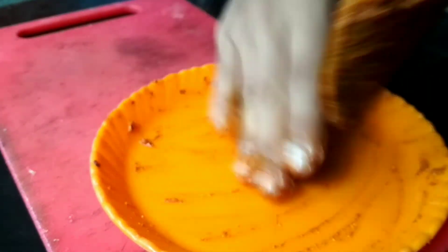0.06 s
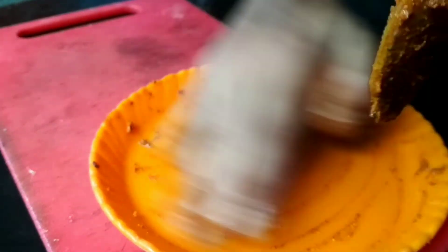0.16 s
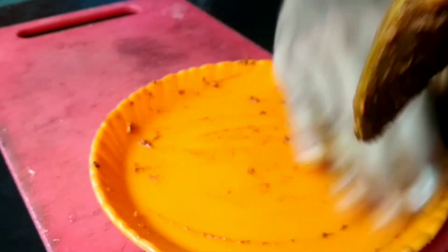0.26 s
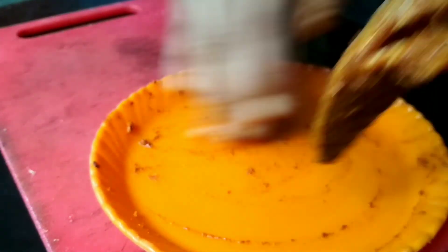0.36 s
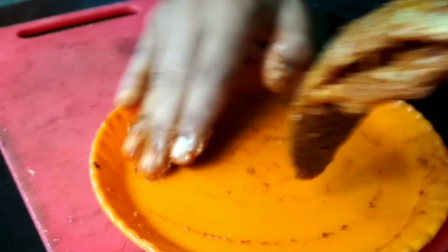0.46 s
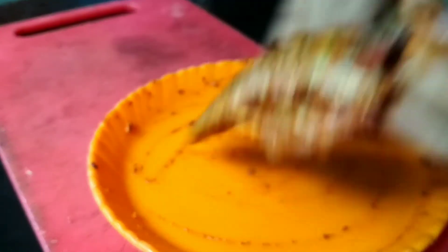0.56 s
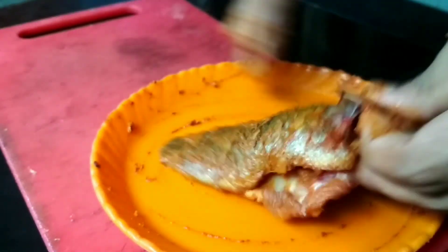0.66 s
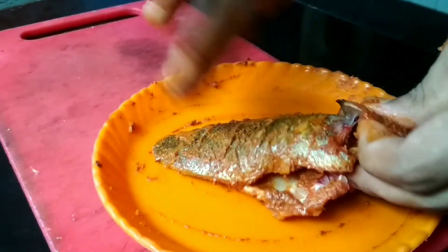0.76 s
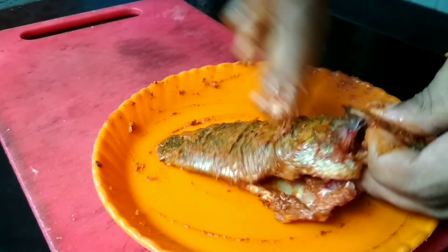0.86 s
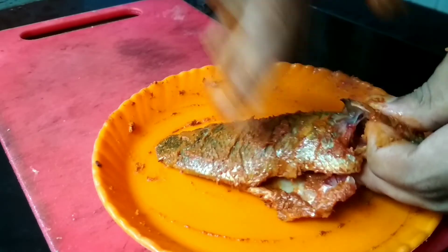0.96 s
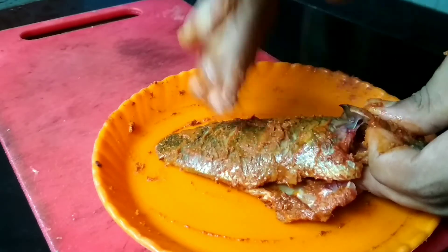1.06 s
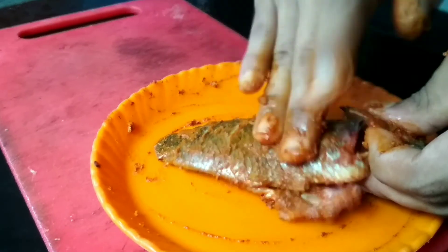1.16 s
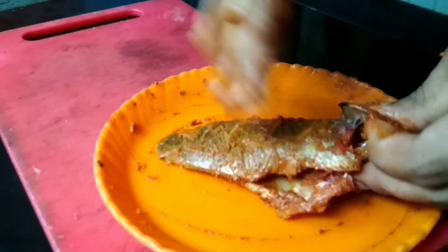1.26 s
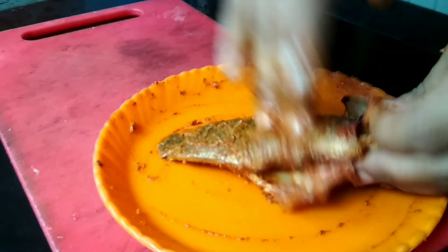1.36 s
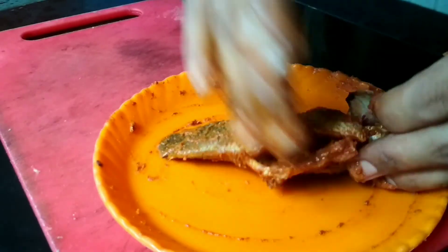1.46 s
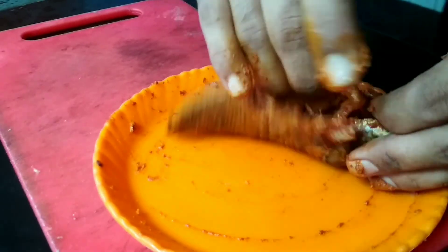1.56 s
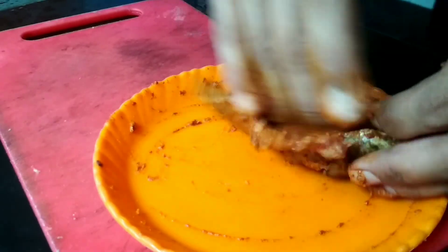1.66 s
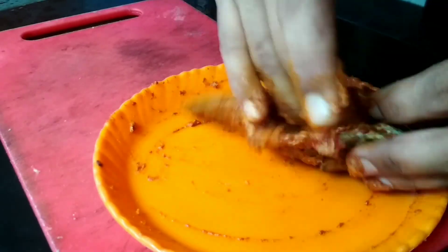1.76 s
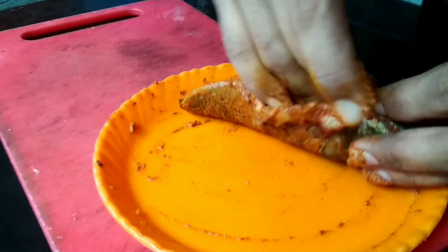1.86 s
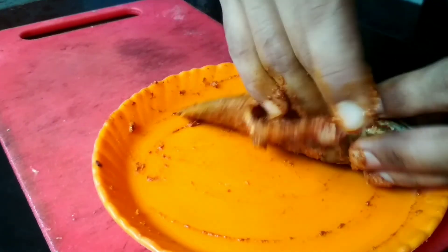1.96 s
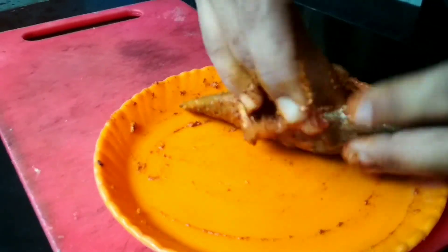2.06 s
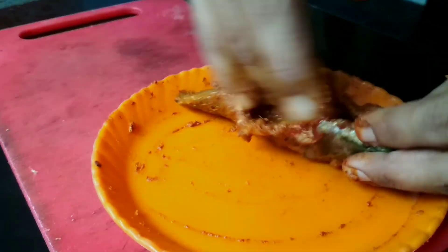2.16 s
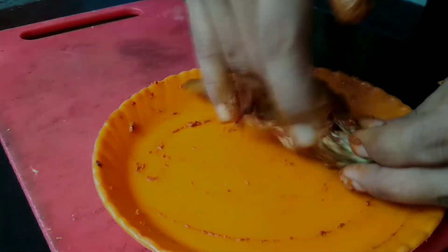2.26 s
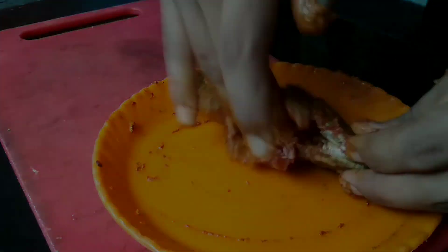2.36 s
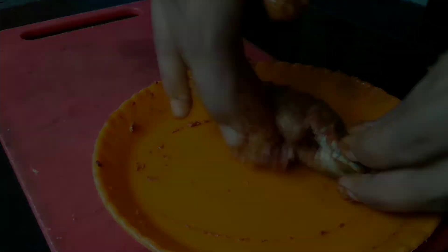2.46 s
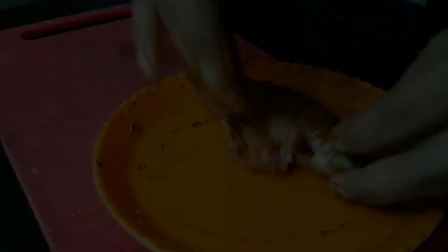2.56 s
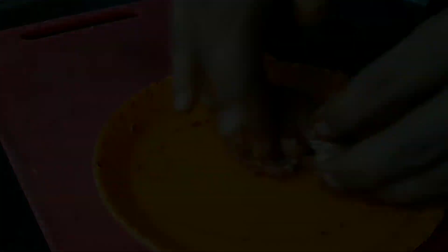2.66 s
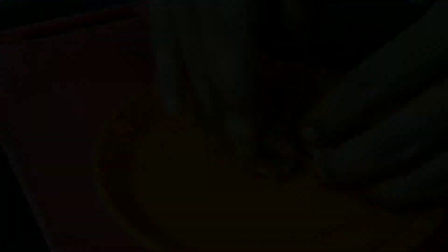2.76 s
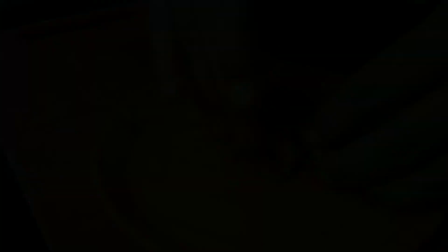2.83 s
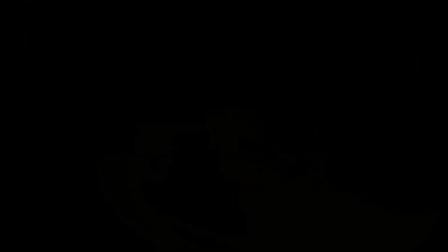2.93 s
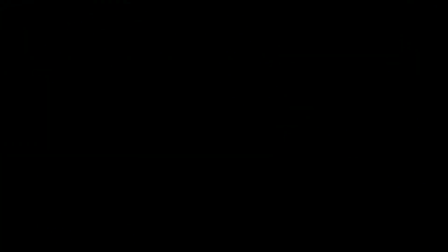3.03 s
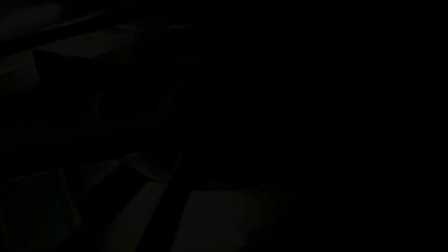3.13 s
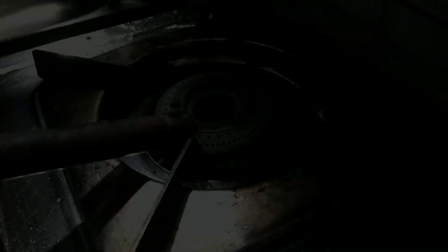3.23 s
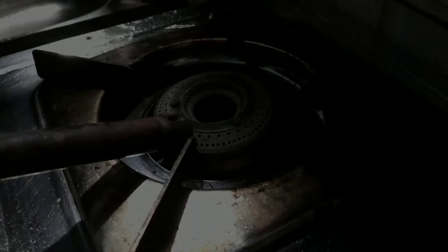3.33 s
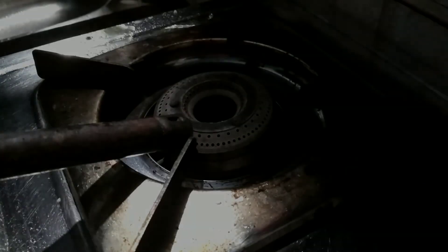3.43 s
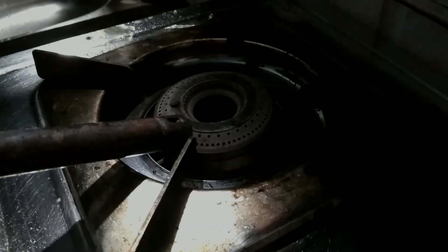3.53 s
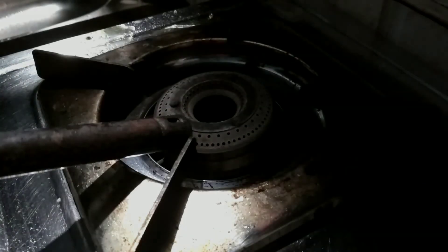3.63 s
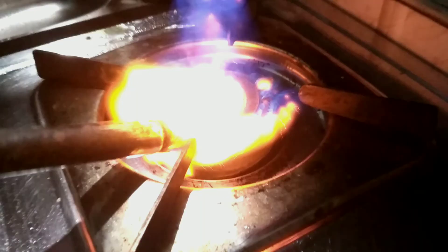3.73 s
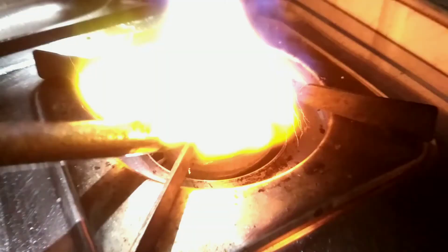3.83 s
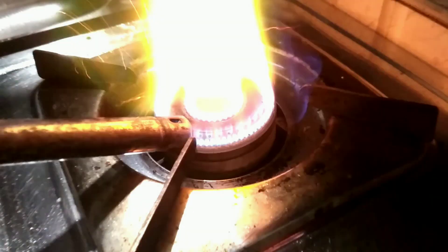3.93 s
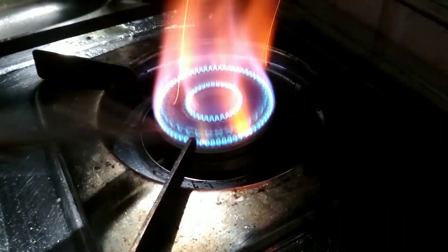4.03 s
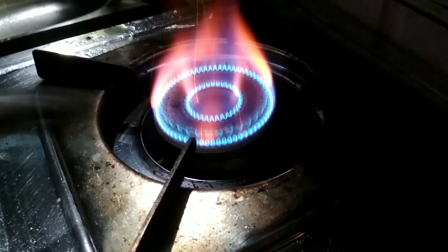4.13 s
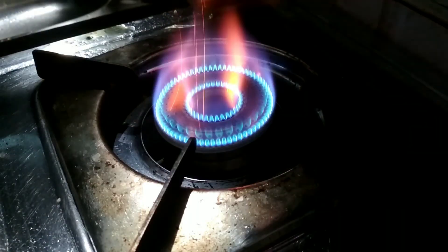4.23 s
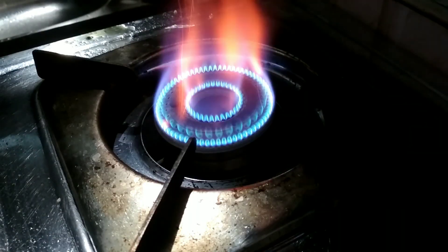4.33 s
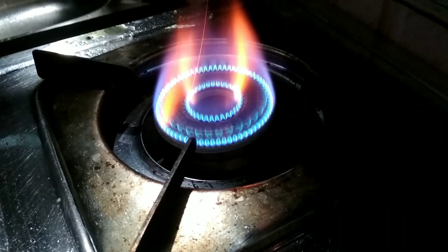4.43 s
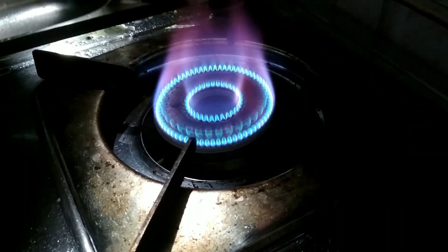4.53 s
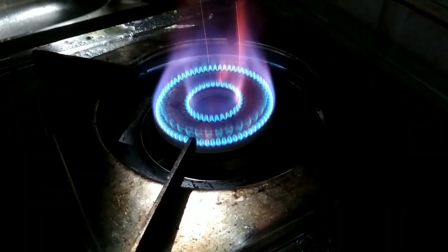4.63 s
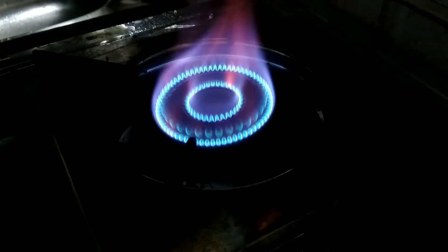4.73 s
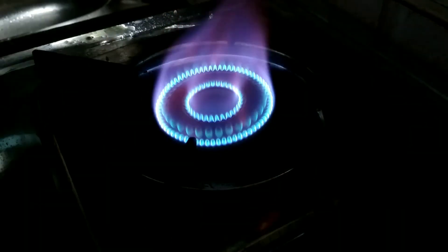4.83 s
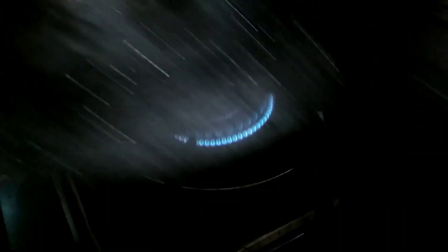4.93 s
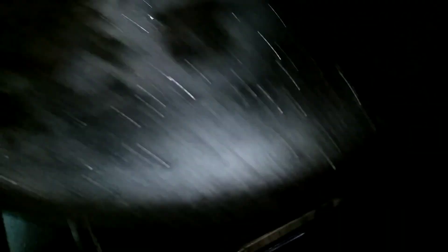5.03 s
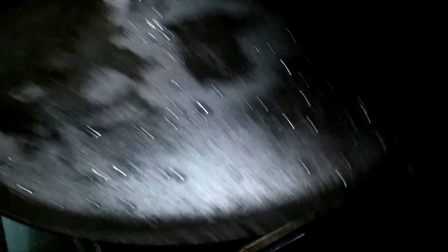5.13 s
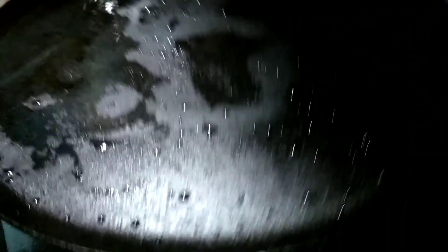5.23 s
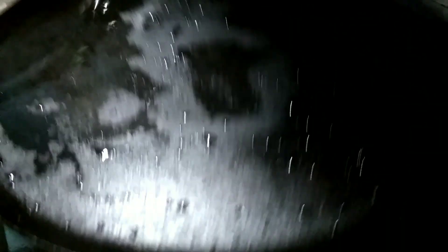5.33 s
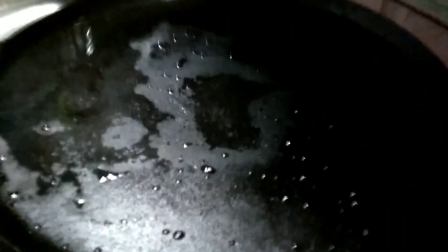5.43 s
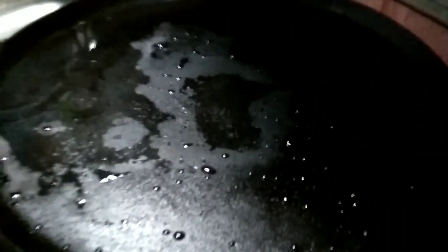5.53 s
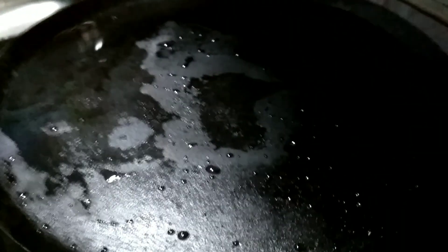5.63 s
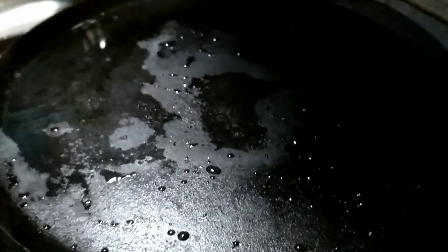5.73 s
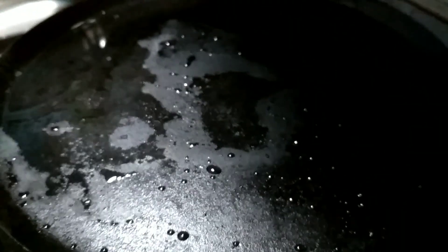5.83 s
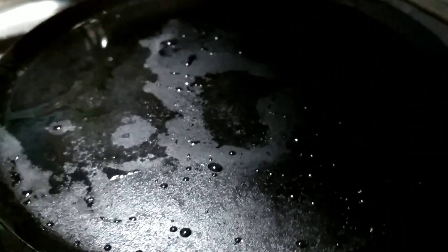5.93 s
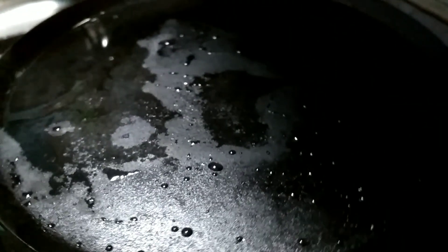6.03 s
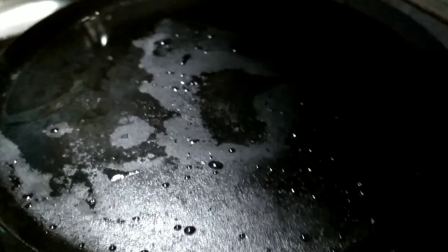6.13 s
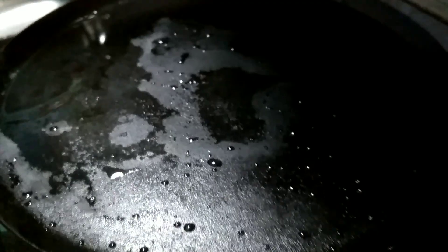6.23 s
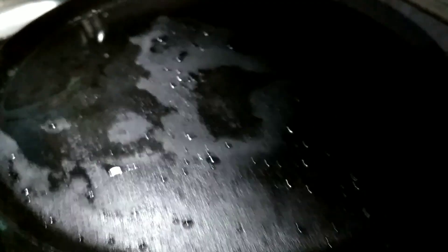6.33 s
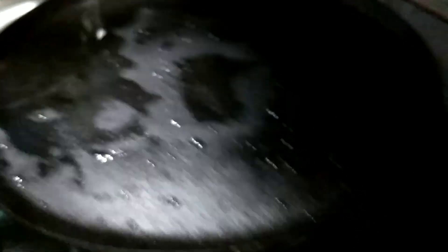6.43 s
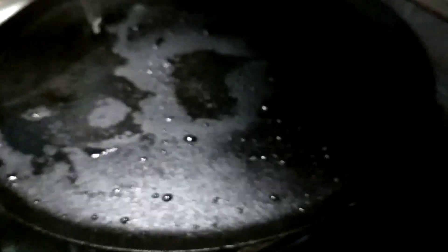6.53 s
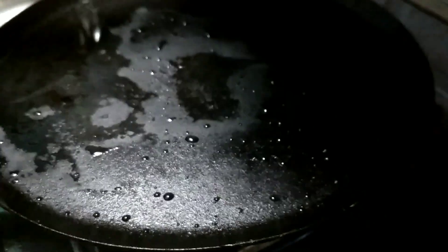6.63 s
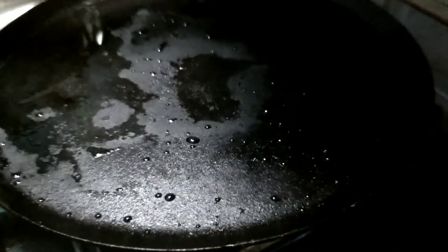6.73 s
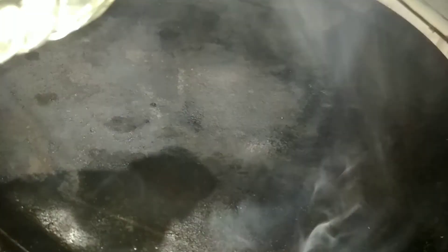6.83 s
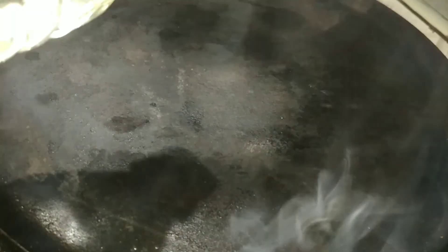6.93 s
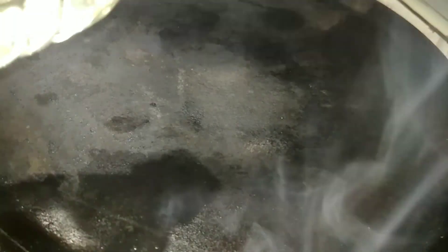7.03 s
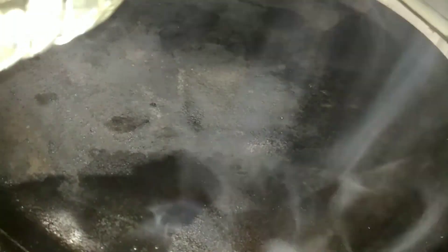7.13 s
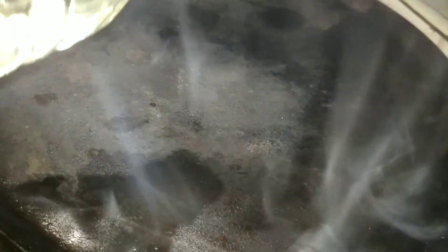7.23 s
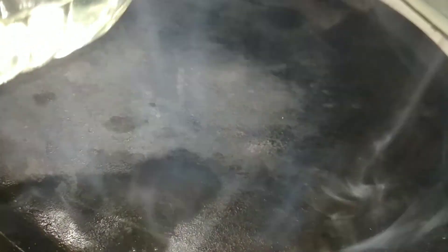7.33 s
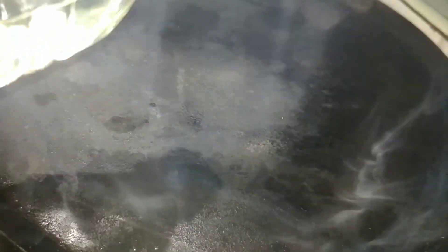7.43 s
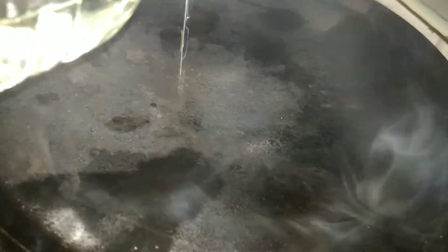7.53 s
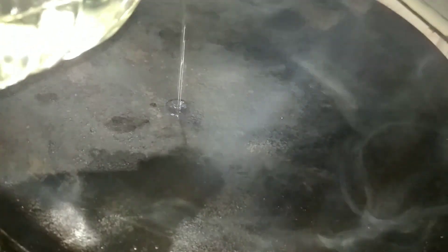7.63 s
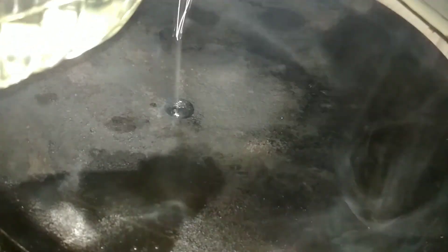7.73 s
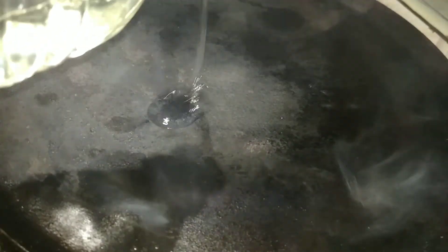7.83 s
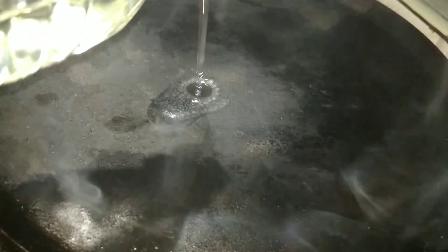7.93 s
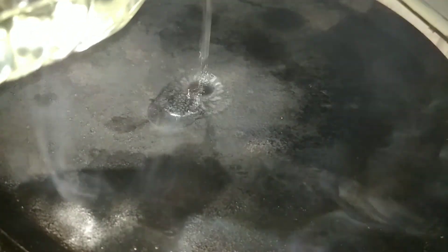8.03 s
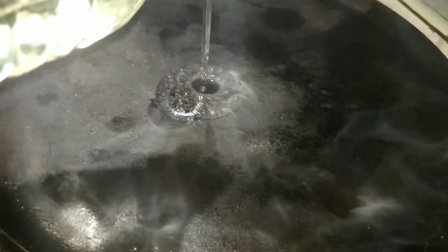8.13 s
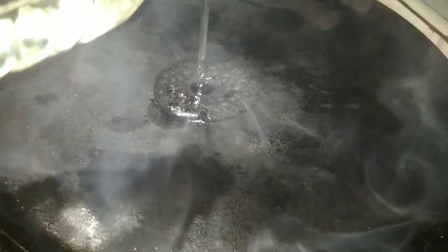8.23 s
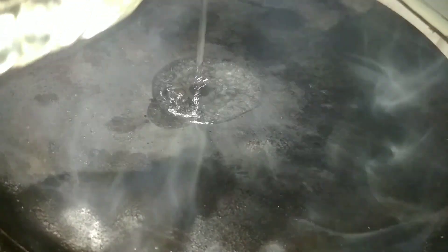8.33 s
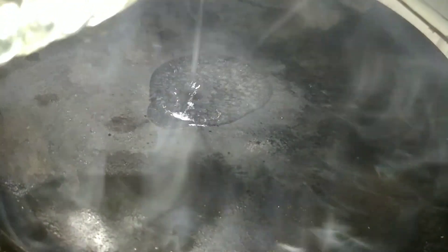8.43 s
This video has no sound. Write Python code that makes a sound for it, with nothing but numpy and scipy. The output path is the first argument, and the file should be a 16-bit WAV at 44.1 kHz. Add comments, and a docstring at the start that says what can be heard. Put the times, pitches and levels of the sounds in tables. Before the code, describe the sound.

For the first two and a half seconds, wet hands rub spice paste into a fish close by: quiet sticky crackles, snaps and squelches, with soft thuds from a plastic plate. Birds and a thin, high insect call very faintly outside. At about 3.4 seconds a gas knob squeaks softly, and at 3.8 the burner catches with a loud crack and whoomp, settling into a faint low flutter and hiss, with a soft rasping insect behind it. At 5.5 seconds a metal pan lands on the grate with a loud, ringing clank. It is knocked and dragged into place until about 7 seconds, scraping hardest around 6.5 and squeaking briefly. From 7 seconds a cricket trills steadily. Just after 8 seconds oil hits the hot pan with a short spit and a faint sizzle.

```python
"""Wet hands rub spice paste into a fish: the paste crackles and snaps, the plastic plate thuds, and
birds and a high insect call outside. This fades out as a stove and a rasping insect fade in.
A gas knob squeaks; the gas catches with a crack and a whoomp, then burns with a low flutter.
A metal pan clanks onto the grate and rings as it is dragged into place and knocked.
A cricket starts to trill, and at last oil hits the hot pan with a spit and a sizzle."""
import sys
import numpy as np
from scipy import signal
from scipy.fft import rfft, irfft, next_fast_len
from scipy.io import wavfile
from scipy.ndimage import map_coordinates

SR = 44100
rng = np.random.default_rng(int(sys.argv[2]) if len(sys.argv) > 2 else 0)


def unload_wav(signal):
    """Save mono or channel-first audio to the path in sys.argv[1] as 16-bit WAV at rate SR, clipped to [-1, 1]."""
    wavfile.write(
        sys.argv[1],
        SR,
        np.round(np.clip(np.atleast_2d(signal).T, -1, 1) * 32767).astype(np.int16),
    )


N = 374409
T = np.arange(N) / SR
LIGHT_S = 3.8185  # the gas catches

# Tone of a sharp snap: pitch_hz, level_db
SNAP_TONE = [(4000, -50), (6800, -12), (11300, 9.5), (15500, 5)]
# Tone of hissing gas: pitch_hz, level_db
HISS_TONE = [(1760, -12), (3000, -6), (5400, -11), (7830, -7.5), (11400, 2), (14900, -5), (16000, -28)]
# Tone of metal clinking on metal: pitch_hz, level_db
CLINK_TONE = [(1470, -25), (2500, -0.5), (3860, -12), (12100, 0), (15200, 3.5), (16000, -34)]
# Notes at which the pan and grate ring: pitch_hz, level_db, ring_s (time to fall by 60 dB)
PAN_NOTES = [(100, -3.5, 0.29), (158, -3, 0.5), (242.1, 1.5, 0.38), (361.7, 4, 0.21), (403.8, -2, 0.34),
             (630.3, 3.5, 0.08), (691, -3.5, 0.12), (759, -3.5, 0.17), (828, -5.5, 0.23), (857, -0.5, 0.2),
             (1027, -8, 0.5), (1430, -12.5, .4)]


def amp(db):
    """Turns decibels into a gain to multiply by."""
    return np.exp(np.asarray(db) * (np.log(10) / 20))


def unit(x):
    """Scales a signal to an average (rms) level of 1."""
    return x / np.sqrt(np.mean(x ** 2) + 1e-20)


def read(points, hz):
    """Looks up values between a table's rows, on a musical (log) pitch scale."""
    pitches, values = np.transpose(points)
    return np.interp(np.log(hz + 1), np.log(pitches + 1), values)


def balance(db):
    """Two gains that make the left channel db louder than the right."""
    return amp([[db / 2], [-db / 2]])


def add(mix, start_s, sound):
    """Mixes a sound in at start_s."""
    part = mix[:, round(start_s * SR):][:, :sound.shape[-1]]
    part += sound[..., :part.shape[1]]


def ramp(start_s, length_s):
    """Rises from 0 to 1 and stays there."""
    return np.clip((T - start_s) / length_s, 0, 1)


def swell(full_s, hold_s, rise_db_per_s, fall_db_per_s):
    """A gain that grows until full_s, holds and dies away."""
    before_db = rise_db_per_s * np.maximum(full_s - T, 0)
    after_db = fall_db_per_s * np.maximum(T - full_s - hold_s, 0)
    return amp(-np.minimum(before_db + after_db, 200))


def dying(ring_s):
    """One second of a gain that falls by 60 dB every ring_s."""
    return amp(-60 * T[:SR] / ring_s)


def blip(peak_s):
    """A soft pulse that peaks after peak_s and dies away."""
    age = T[:SR] / peak_s
    return age * np.exp(1 - np.minimum(age, 200))


def fade_out():
    """Gain that fades the room air and the high insect out."""
    return (1 - ramp(2.473, .98)) ** 2.5


def fade_in():
    """Gain that fades the steady sounds at the stove in."""
    return ramp(3.2, .98) ** 1.15


def waver(per_s, size=N):
    """A random wobble of average size 1 that turns per_s times a second."""
    return unit(np.interp(T[:size] * per_s, np.arange(9000), rng.standard_normal(9000)))


def colour(x, tone):
    """Gives two channels a tone (rows of pitch_hz, level_db) and makes their bass alike."""
    # How alike left and right are: pitch_hz, likeness (0 to 1)
    likeness = [(40, 0.84), (290, 0.93), (640, 0.49), (1400, 0)]
    size = next_fast_len(x.shape[1])
    spectrum, hz = rfft(x, size), np.fft.rfftfreq(size, 1 / SR)
    same = np.clip(read(likeness, hz), -1, 1)
    spectrum[1] = same * spectrum[0] + np.sqrt(1 - same ** 2) * spectrum[1]
    lowest, highest = tone[0][0], tone[-1][0]
    edges = 1 / (1 + (hz / highest) ** 8) / (1 + (lowest / (hz + 1)) ** 8)
    return unit(irfft(spectrum * amp(read(tone, hz)) * edges, size)[:, :x.shape[1]])


def noise(tone, size=N):
    """Stereo noise with the given tone."""
    return colour(rng.standard_normal((2, size)), tone)


def grains(tone, per_s, spread_db):
    """A stream of tiny clicks of uneven size."""
    sizes = amp(spread_db * np.minimum(rng.exponential(1, N), 4))
    clicks = sizes * (rng.random(N) < per_s / SR)
    return colour(clicks * rng.standard_normal((2, N)), tone)


def band(pitch_hz, width_hz):
    """Noise gathered around one pitch."""
    size = next_fast_len(N)
    distance = (np.fft.rfftfreq(size, 1 / SR) - pitch_hz) / width_hz
    spectrum = rfft(rng.standard_normal((2, size))) / (1 + distance ** 2) ** 1.5
    return unit(irfft(spectrum, size)[:, :N])


def patchy(x, depth_db, width_hz, length_s):
    """Lets each range of pitches swell and sink on its own."""
    hz, t, spectrum = signal.stft(x, SR, nperseg=512)
    grid = np.meshgrid(hz / width_hz, t / length_s, indexing="ij")
    patches = map_coordinates(rng.standard_normal(spectrum.shape[1:]), grid, order=1, mode="wrap")
    return unit(signal.istft(spectrum * amp(depth_db * unit(patches)), SR)[1][:, :N])


def tail(x, ring_times):
    """Lets each pitch in one second of noise die at its own speed."""
    hz, t, spectrum = signal.stft(x, SR, nperseg=512)
    decay = amp(-60 * t / read(ring_times, hz)[:, None])
    return signal.istft(spectrum * decay, SR, nperseg=512)[1][:, :SR]


def ring(notes):
    """The dying notes of a struck object; high ones reach left and right out of step."""
    out = np.zeros((2, SR))
    for hz, db, ring_s in notes:
        phase = rng.uniform(0, 2 * np.pi) + min(hz / 900, np.pi) * rng.uniform(-1.8, 1, (2, 1))
        out += amp(db) * dying(ring_s) * np.sin(2 * np.pi * hz * T[:SR] + phase)
    return out * (1 - dying(0.03))


def excite(force, ringing):
    """Lets every little push in a force start the same ringing."""
    return signal.oaconvolve(force, ringing, axes=1)[:, :N] / np.linalg.norm(ringing[0])


def sine(hz):
    """A pure tone that follows a changing pitch."""
    return np.sin(2 * np.pi * np.cumsum(hz) / SR)


def whistles(notes, echo_db, echo_s):
    """Gliding, unsteady notes with their echo."""
    out = np.zeros((2, N))
    for start_s, length_s, first_hz, last_hz, db, wobble_hz in notes:
        size = int(length_s * SR)
        hz = np.linspace(first_hz, last_hz, size) + wobble_hz * waver(395.5, size)
        loudness = signal.windows.tukey(size, .5) * amp(3.8 * waver(94.2, size))
        add(out, start_s, amp(db) * unit(sine(hz) * loudness))
    echo = unit(rng.standard_normal((2, SR)) * dying(echo_s)) / np.sqrt(SR)
    return 0.81 * out + amp(echo_db) * signal.oaconvolve(out, echo, axes=1)[:, :N]


def room_air():
    """A faint, shifting rumble and hiss."""
    # Tone of the room: pitch_hz, level_db
    air_tone = [(15, -19), (25, 3.5), (195, -4.5), (659, -22), (2910, -14.5), (5730, -19.5), (10100, -10),
                (14800, -5), (16000, -19.5)]
    return amp(-66) * patchy(noise(air_tone), 2.5, 350, .07)


def birds():
    """Distant birds whistle short notes, with more echo than direct sound."""
    # Bird notes: start_s, length_s, first_hz, last_hz, level_db, wobble_hz
    calls = [(.615, 0.14, 1125, 1217, -65, 53.3), (1.525, 0.18, 1115, 1229, -68.5, 55),
             (2.395, 0.16, 1128, 1237, -72.5, 52), (2.48, 0.15, 3420, 2466, -71.5, 229),
             (2.57, 0.11, 2476, 2400, -72.5, 81), (2.7, 0.073, 3045, 3110, -64.5, 53),
             (2.81, 0.059, 3470, 3543, -70, 31), (4.49, 0.11, 2987, 3006, -71, 51.7),
             (2.72, 0.25, 2700, 2520, -80, 399)]
    return whistles(calls, echo_db=3.5, echo_s=0.48)


def high_insect():
    """A thin tone on the right that warbles with each wingbeat."""
    wingbeats = np.cumsum(42 * (1 + .2 * waver(30))) / SR
    hz = 10890 + 110 * np.sin(2 * np.pi * wingbeats) + 60 * waver(15) + 50 * waver(900)
    return amp(-69.5) * sine(hz) * balance(-24.5)


def insect_whine():
    """A thin, steady, insect-like whine."""
    hz = 11747 + 9 * ramp(6.85, 0.22) + 2 * waver(8)
    return amp(-62) * sine(hz) * balance(-2.9)


def rasping_insect():
    """An insect chirps about eight times a second, in three falling pulses, over its own echo."""
    repeat_s, pulse_s = .129, .021
    pulses = (T - 6.3 + .002 * waver(8)) % repeat_s / pulse_s
    within = pulses % 1
    hz = 7450 - 900 * within + 220 * waver(1500)
    pulse_shape = (pulses < 3) * np.sin(np.pi * within ** .5) ** 2
    chirp = pulse_shape * np.sin(np.pi * (pulses + .5) / 4) * amp(waver(40))
    echo = (.5 + .5 * np.exp(-((pulses - 2) / 2) ** 2)) * band(7070, 340)
    return amp(-59) * chirp * sine(hz) + amp(-61.5) * echo


def cricket():
    """A cricket's wings make a fast, pure trill; each stroke sags in pitch."""
    strokes = np.cumsum(51 * (1 + .1 * waver(30))) / SR
    hz = 5278 - 60 * (strokes % 1 - .5) + 6 * waver(71)
    trill = abs(np.sin(np.pi * strokes)) * sine(hz) * amp(waver(40))
    song = amp(-47.5) * trill * balance(10.2) + amp(-56.5) * band(5240, 140)
    return song * ramp(start_s=6.98, length_s=0.088)


def burner():
    """A low flutter grows as the gas lights and dulls under the pan; the jet hisses."""
    # Tones of the open flame, the flame under the pan and the gas jet: pitch_hz, level_db
    open_tone = [(15, -42), (25, -10), (81, 0), (386, -15), (883, -26), (1070, -32), (1570, -20.5),
                 (1870, -31), (2100, -52.5), (5500, -110)]
    covered_tone = [(15, -37), (25, -4.5), (86, -1), (193, -4.5), (257, -13.5), (567, -24.5), (687, -45.5),
                    (1270, -49.5), (1430, -28), (1570, -17.5), (2500, -62)]
    jet_tone = [(2500, -29), (3700, -19), (4500, 7), (5400, -37.5), (7800, -15), (8800, -0.5),
                (11000, -5.5), (14200, -0.5), (15300, -23)]
    covered = ramp(6.85, 0.22)
    flame = amp(-55.5) * noise(open_tone) * (1 - covered) + amp(-57) * noise(covered_tone) * covered
    flame *= amp(0.5 * waver(25)) * (amp(-5) * fade_in() + amp(-9) * ramp(LIGHT_S, 0.029))
    jet = amp(-60) * patchy(noise(jet_tone) + amp(-8) * band(12930, 130), 2.2, 600, .07)
    return flame + jet * fade_in()


def gas_knob():
    """The gas knob scrapes as it turns and unlit gas starts to hiss."""
    # Scrapes of the gas knob: start_s, length_s, level_db
    brushes = [(3.348, 0.031, -63), (3.48, 0.6, -59.5)]
    gas_on_s = 3.67
    touch = sum(amp(db) * swell(start_s, length_s, 165, 240) for start_s, length_s, db in brushes)
    brush = touch * noise([(180, -0.5), (245, 12), (400, -7), (800, -8), (1400, -11), (2600, -38)])
    return brush + amp(-72.5) * swell(gas_on_s, LIGHT_S - gas_on_s, 400, 200) * noise(HISS_TONE)


def squeaks():
    """The gas knob squeaks as it turns, and later so does the pan."""
    # Squeaks: start_s, length_s, first_hz, last_hz, level_db, wobble_hz
    notes = [(3.425, 0.098, 306.5, 254, -53, 22), (3.425, 0.11, 602, 546, -62, 36),
             (6.555, 0.047, 4420, 4520, -38.5, 90), (6.98, 0.087, 297, 283, -49.5, 3.9)]
    return whistles(notes, echo_db=-2.5, echo_s=0.19)


def oil():
    """Oil lands on the hot pan with a short spit, then sizzles in uneven patches as it spreads."""
    land_s, fall_db_per_s = 8.084, 12
    oil_tone = [(500, -7), (2800, -5.5), (6000, -9), (11500, 11), (15500, 6)]
    loudness = amp(-65 - fall_db_per_s * np.maximum(T - land_s, 0)) * ramp(land_s, 0.02)
    bubbles = grains([(2200, 0), (4400, 4), (5100, -14)], 4000, 1.0)
    out = loudness * patchy(grains(oil_tone, 1400, 1.5) + bubbles, 5.5, 300, .03)
    spit = amp(-44) * noise(oil_tone, SR) * (blip(.003) + amp(-5.5) * dying(0.49))
    add(out, land_s, spit)
    return out


def plate():
    """The hand judders over the plate in soft thuds, with a faint rumble of rubbing between them."""
    # Pushes of the hand: start_s, length_s, level_db
    pushes = [(0.162, .045, -45), (.262, .015, -48.5), (0.336, .075, -43.5), (0.514, .015, -39),
              (0.636, .045, -44), (0.739, .045, -41.5), (1.192, .075, -48), (1.63, .045, -48.5)]
    # Notes of the plastic plate: pitch_hz, level_db, ring_s
    plate_notes = [(187.5, -1, 0.12), (358, -11.5, 0.036)]
    slip_gap_s = .03
    rumble = noise([(60, 7.5), (100, 3), (185, 5.5), (350, -12), (800, -21)])
    out = amp(-73.5) * rumble * amp(6.4 * waver(22.07)) * swell(0, 2.37, 0, 77)
    for start_s, length_s, push_db in pushes:
        for delay_s in np.arange(0, length_s, slip_gap_s):
            load = rng.uniform(0.87, 1.067)  # the hand's weight shifts the plate's pitch
            thud = ring([(hz * load, db, ring_s) for hz, db, ring_s in plate_notes])
            add(out, start_s + delay_s, amp(push_db) * thud * (1 - dying(0.021)))
    return out


def paste():
    """Paste crackles under the fingers; sticky films snap and peel away, and trapped air pops."""
    # Wipes of the hand through the paste: start_s, length_s, level_db
    wipes = [(0.253, 0.096, -61), (.56, 0.035, -58), (.68, 0.035, -59.5), (1.59, 0.038, -55),
             (2.413, 0.043, -52)]
    # Wet smacks of paste and skin: start_s, rise_s, snap_db, slap_db
    smacks = [(0.8725, .0005, -35, -88), (0.888, .0004, -29, -88), (1.027, .0016, -43, -53),
              (1.0385, .0006, -36, -70), (1.0494, .0004, -29.5, -58), (1.1075, .0003, -38.5, -80),
              (1.1985, .001, -32, -53), (1.2402, .0004, -38.5, -70), (1.3495, .0024, -39.5, -55),
              (1.433, .0004, -41, -77), (1.502, .0007, -38, -78), (1.592, .0008, -37, -70),
              (1.7395, .0016, -45, -75), (2.3085, .0016, -45, -62), (2.405, .003, -45, -65),
              (2.443, .0022, -38, -65)]
    # Air pops under the fish skin: start_s, level_db
    pops = [(1.9528, -45), (2.0805, -47)]
    # Tones of the wet crackle, a pop and a fleshy slap: pitch_hz, level_db
    wet_tone = [(1180, -10), (3000, -17), (4300, -24), (6760, -14), (11300, 9.5), (15500, 0)]
    pop_tone = [(3800, -11), (6200, -7), (9000, -7.5), (14000, -4)]
    slap_tone = [(300, -5), (900, -1.5), (1800, 7.5), (4500, 4), (7000, 13.5)]
    rub = amp(-65 + 2.5 * np.tanh(waver(9.7))) * swell(0, 2.57, 0, 82)
    wipe = sum(amp(db) * swell(start_s, length_s, 300, 300) for start_s, length_s, db in wipes)
    crackle = patchy(grains(wet_tone, 1500, 1.5) + .4 * grains(wet_tone, 90, 2), 2.5, 1200, .035)
    out = np.hypot(rub, wipe) * crackle
    peeling = np.zeros((1, N))  # smaller snaps follow each smack
    for start_s, rise_s, snap_db, slap_db in smacks:
        snap = amp(snap_db) * noise(SNAP_TONE, SR) * (blip(rise_s) + amp(-22.5) * dying(0.33))
        slap = amp(slap_db) * noise(slap_tone, SR) * (blip(0.0015) + amp(-8) * dying(0.28))
        add(out, start_s, snap + slap)
        add(peeling, start_s, amp(snap_db - 30) * dying(0.51))
    for start_s, db in pops:
        add(out, start_s, amp(db) * noise(pop_tone, SR) * (dying(0.013) + amp(-14.5) * dying(0.51)))
    return out + peeling * grains(wet_tone, per_s=570, spread_db=3.2)


def fish():
    """Each squeeze squelches the flesh and smears the paste, over the crackle and the thuds."""
    # Squeezes of the flesh: start_s, length_s, squelch_db, smear_db
    squeezes = [(1.796, 0.035, -96, -61.5), (1.993, 0.088, -75, -90), (2.28, 0.062, -63.5, -66.5),
                (2.52, 0.021, -73.5, -71.5)]
    flesh = grains([(260, -7), (350, 12), (450, -5), (600, -20)], 140, 1.2)
    skin = grains([(1400, 5), (1850, -4), (2500, -6), (5000, -5), (8000, 10)], 1600, 1.2)
    squelch = smear = 0
    for start_s, length_s, squelch_db, smear_db in squeezes:
        grip = swell(start_s, length_s, 250, 220)
        squelch += amp(squelch_db) * grip
        smear += amp(smear_db) * grip
    return (paste() + smear * skin) * balance(-4) + plate() + squelch * flesh


def ignition():
    """The flame cracks through the pooled gas, which burns off in a whoomp; a last pocket flares."""
    # Tones of the whoomp, the last flare, the swirls and the crack: pitch_hz, level_db
    roar_tone = [(32, -40), (55, -17), (95, -5.5), (176, -8.5), (239, -3), (319, -12), (537, -15.5),
                 (642, -11.5), (903, -22), (1290, -18.5), (4000, -42.5)]
    flare_tone = [(300, -1), (850, 0), (1400, -10), (2300, -11.5), (3500, -20), (11000, -16)]
    swirl_tone = [(330, 7), (900, 3), (1400, 6), (2300, -3.5), (3500, -42)]
    crack_tone = [(200, -15), (1500, 9), (6000, -10), (11000, 4), (15000, 5.5)]
    flare_s = 4.032
    burst = amp(-20) * swell(LIGHT_S, 0.044, 0, 231)
    tall_flames = amp(-41.5) * swell(LIGHT_S, 0.19, 0, 81)
    fire = np.hypot(burst, tall_flames)
    roar = fire * noise(roar_tone) * amp(0.83 * waver(70))
    tongues = patchy(grains(HISS_TONE, 9000, 1.1), 2.8, 800, .012)
    hiss = amp(-35) * swell(LIGHT_S, 0.096, 0, 113) * tongues
    # small swirls at the flame's edge add a tearing sound
    swirls = amp(-12.5) * fire * grains(swirl_tone, 1100, 1.4) * amp(2 * waver(60))
    out = (T >= LIGHT_S) * ((roar + swirls) * balance(0.94) + hiss * balance(-1.7))
    crack = amp(-23.5) * noise(crack_tone, SR) * dying(0.065)
    ms = T[:SR] / .001
    pressure = amp(7) * ms * (1 - ms) * np.exp(-2 * ms)  # rises fast, then swings below zero
    add(out, LIGHT_S, crack + pressure)
    add(out, flare_s + .006, amp(-38) * noise(SNAP_TONE, SR) * blip(0.0023))
    return out + amp(-46) * swell(flare_s, 0.015, 99, 440) * grains(flare_tone, 2000, 1.9)


def wall_tone():
    """The treble tone of the pan wall: its overtones stand out as peaks above a smooth slope."""
    # Clusters of high overtones: pitch_hz, level_db
    clusters = [(2140, -1), (3375, -0.5), (4130, -3.5), (5020, -0.5), (5330, -6), (6065, -6), (6740, -0.5),
                (7750, -4), (8480, -2), (9194, 0.5), (9915, -1.5), (10422, 0.5), (11111, 0), (11700, 5),
                (12400, 1.5), (13020, 5), (13600, 0), (14900, 1)]
    hz, width_hz = np.linspace(2000, 15500, 1200), 130
    power = sum(amp(db) ** 2 / (1 + (2 * (hz - peak_hz) / width_hz) ** 2) for peak_hz, db in clusters)
    slope = amp(read(CLINK_TONE, hz) - 7) ** 2
    return np.c_[hz, 10 * np.log10(power / power.mean() + slope)]


def wall_ring():
    """The pan wall rings with crowded overtones and one clear, throbbing note."""
    ring_s, bell_hz, throb_hz = 0.67, 3368, 11
    bell = unit(ring([(bell_hz, 0, ring_s), (bell_hz + throb_hz, 0, ring_s)]))
    clusters = unit(noise(wall_tone(), SR) * dying(ring_s))
    return (clusters + amp(-21) * bell) * dying(ring_s).std()


def pan_drag(overtones):
    """Rough iron catches and slips on the grate with each shove, and the catches ring the pan."""
    # Shoves of the pan: start_s, length_s, body_db, treble_db
    shoves = [(5.76, 1, -53, -75), (6.128, 0.1, -54, -57), (6.401, 0.015, -42.5, -41.5),
              (6.438, 0.12, -29, -33.5), (6.943, 0.018, -59.5, -75)]
    # Light scratches of its base on the grate: start_s, length_s, level_db
    scratches = [(5.716, 0.036, -37.5), (5.93, 0.012, -48), (5.972, 0.018, -48), (6.082, 0.0088, -47.5),
                 (6.122, 0.011, -42), (6.19, .025, -49), (6.705, .015, -49), (6.882, .003, -61),
                 (6.91, .002, -57)]
    # Tones of the dragging, its jolts and the scratches: pitch_hz, level_db
    drag_tone = [(71, -36), (120, -25.5), (222, 3), (400, -7), (630, -5), (1610, -16.5), (4000, -23),
                 (5200, -52.5)]
    jolt_tone = [(130, -16), (300, -8), (600, 3), (1000, -6), (2300, -2.5)]
    scratch_tone = [(3000, -20), (6500, -15), (10000, -3.5), (15300, 2)]
    lead_s = 0.0077  # grit scrapes just before the pan moves
    weight = scrape = 0
    for start_s, length_s, body_db, treble_db in shoves:
        weight += amp(body_db) * swell(start_s, length_s, 230, 213)
        scrape += amp(treble_db) * swell(start_s - lead_s, length_s + lead_s, 230, 213)
    surge = amp(waver(45))
    catches = grains(drag_tone, 2200, 0.69) * weight * surge
    ringing = excite(grains(jolt_tone, 900, 4.0) * weight * surge, ring(PAN_NOTES) * dying(0.17))
    ringing *= catches.std() / ringing.std()
    grit = grains(wall_tone(), 5000, 1.0) * scrape * surge
    # touching the grate cuts the pan's ring short
    singing = excite(grains(CLINK_TONE, 1500, 2.2) * scrape * surge, overtones * dying(0.078))
    touch = sum(amp(db) * swell(start_s, length_s, 700, 530) for start_s, length_s, db in scratches)
    scratching = touch * grains(scratch_tone, 3000, 1.2)
    return amp(-2) * catches + amp(-6) * ringing + amp(-4.5) * (grit + singing) + scratching


def bounces(length_s):
    """Delays of the hits in one clatter: each gap is longer than the last."""
    gaps_s = .01 * 1.28 ** np.arange(6)
    delays_s = np.cumsum(gaps_s) - gaps_s
    return delays_s[delays_s <= length_s]


def pan_knocks(overtones):
    """Each hit gives a short clank, a longer rattle of the stove and the ringing notes of the pan."""
    # Metal knocks: start_s, clatter_s, body_db, treble_db, body_top_hz (higher is harder)
    knocks = [(3.335, .005, -55.5, -74, 4000), (5.505, .07, -12, -18, 4515),
              (5.669, .005, -38, -33.5, 3000), (5.718, .016, -36.5, -36.5, 500),
              (5.937, .016, -33, -52, 352), (6.266, .016, -27.5, -31, 3050),
              (6.452, .005, -24.5, -34, 3000), (6.511, .005, -24.5, -32, 3000),
              (6.685, .03, -38, -61, 1180), (6.804, .005, -30.5, -43.5, 3020),
              (6.822, .016, -31.5, -60, 350)]
    # Tone of the stove's body: pitch_hz, level_db
    stove_tone = [(18, -54), (30, -29.5), (60, -11.5), (128, -10), (223, -2), (322, -5.5), (438, -16.5),
                  (476, -8.5), (680, -6.5), (974, -10.5), (2120, -18.5), (4000, -33.5), (5200, -69)]
    # How long the metal rings: pitch_hz, ring_s
    ring_times = [(60, 0.27), (200, 0.98), (500, 0.49), (3000, 0.66), (12000, 0.96)]
    duller_db, fall_db_per_s = 7.5, 40  # bounces lose treble and slowly weaken
    out, treble_tone = np.zeros((2, N)), wall_tone()
    for start_s, clatter_s, body_db, treble_db, top_hz in knocks:
        for delay_s in bounces(clatter_s):
            rattle = amp(2 * waver(150, SR))
            # the body swells in over a few milliseconds
            body = noise(stove_tone, SR) * dying(0.094) * (1 - dying(0.0083))
            body += amp(-15) * tail(noise(stove_tone, SR), ring_times) * rattle
            body += amp(-14.5) * ring(PAN_NOTES)
            body = amp(body_db) * signal.lfilter(*signal.butter(2, top_hz, fs=SR), body)
            clink = noise(CLINK_TONE, SR) * dying(0.068) * (1 - dying(0.0058))
            clink += amp(-17.5) * tail(noise(treble_tone, SR), ring_times) * rattle
            clink += amp(-11.5) * overtones * rattle
            clink *= amp(treble_db - duller_db * (delay_s > 0))
            hit = body * balance(0.84) + clink * balance(-1.5)
            add(out, start_s + delay_s, amp(-fall_db_per_s * delay_s) * hit)
    return out


def metal_pan(overtones):
    """The pan's knocks and scrapes, with unchanging random peaks and dips colouring the treble."""
    sound = pan_knocks(overtones) + pan_drag(overtones)
    hz, spacing_hz = abs(np.fft.fftfreq(4096, 1 / SR)), 70
    ripple = unit(np.interp(hz / spacing_hz, np.arange(len(hz)), rng.standard_normal(len(hz))))
    log_gain = np.log(amp(4.2 * (np.minimum(ripple, 1) - .2) * (hz > 2000)))
    # a filter with these gains that rings only after each hit (minimum phase)
    taps = np.fft.ifft(np.exp(np.conj(signal.hilbert(log_gain)))).real
    return signal.oaconvolve(sound, taps[None], axes=1)[:, :N]


def scene():
    """Adds up all the sources in stereo."""
    out = birds() + squeaks()
    overtones = wall_ring()
    out += (room_air() + high_insect()) * fade_out() + fish()
    out += gas_knob() + ignition() + burner()
    out += insect_whine() * fade_in() + cricket() + rasping_insect() * fade_in()
    return out + metal_pan(overtones) + oil()


def record(dry):
    """Rounds off the loudest peaks and cuts the treble above 15800 Hz."""
    rounded = .9 * np.tanh(dry / .9)
    low_pass = signal.firwin(301, 15800, window=("kaiser", 8), fs=SR)
    return signal.oaconvolve(rounded, low_pass[None], "same")


dry = scene()
out = record(dry)
unload_wav(out)
```